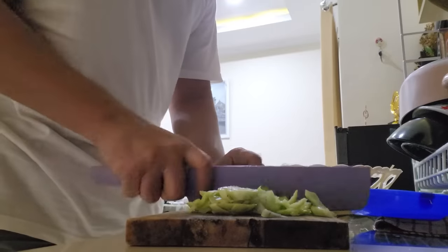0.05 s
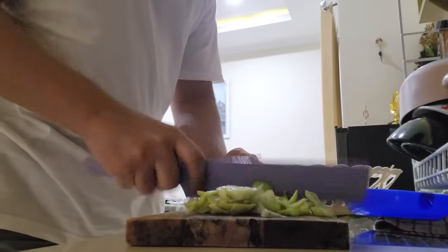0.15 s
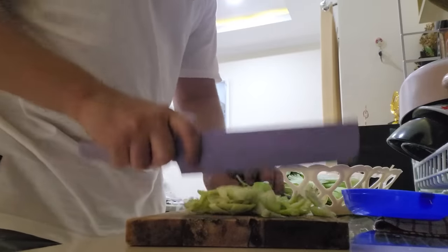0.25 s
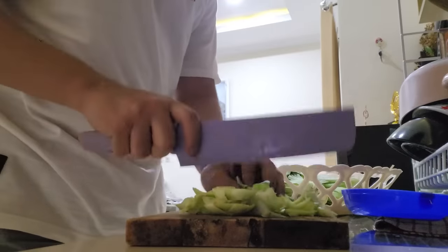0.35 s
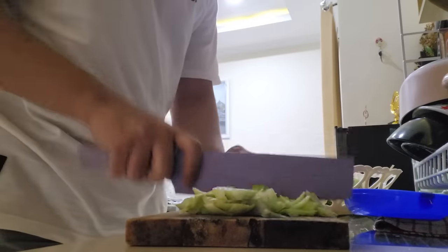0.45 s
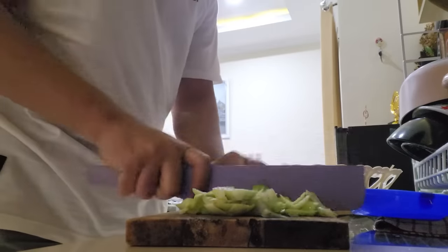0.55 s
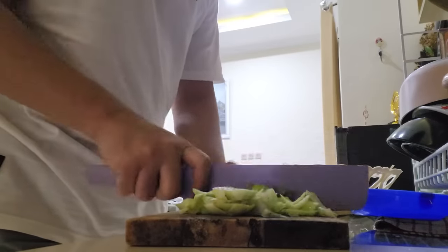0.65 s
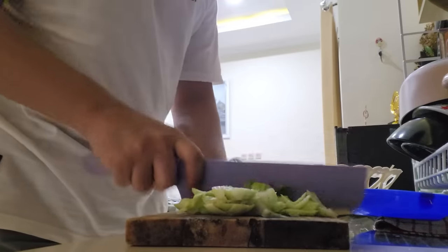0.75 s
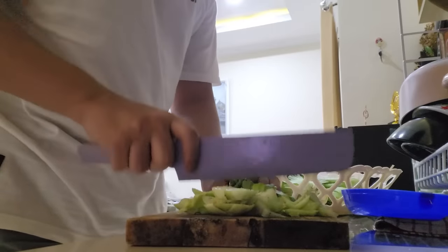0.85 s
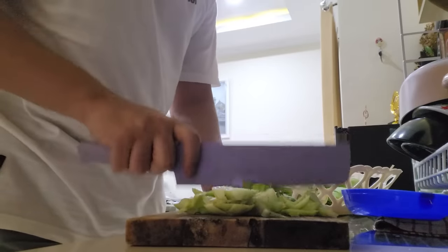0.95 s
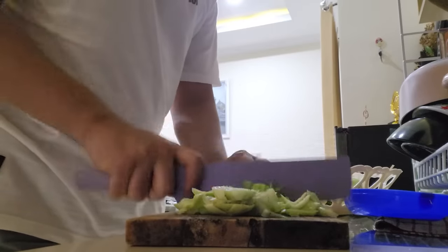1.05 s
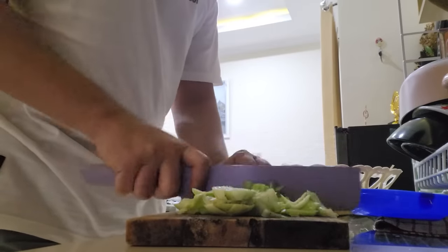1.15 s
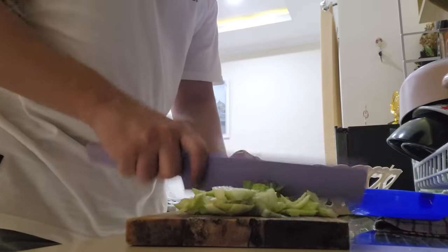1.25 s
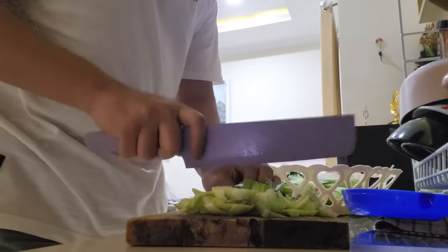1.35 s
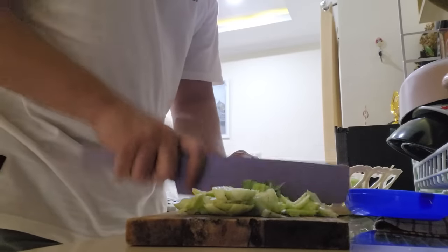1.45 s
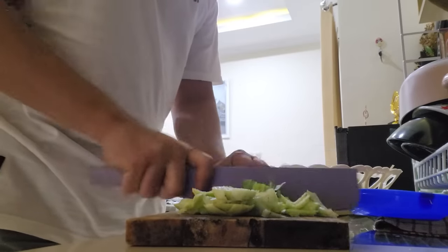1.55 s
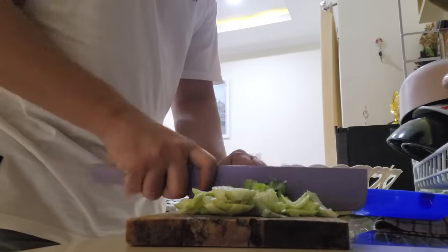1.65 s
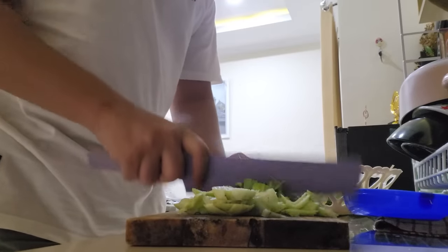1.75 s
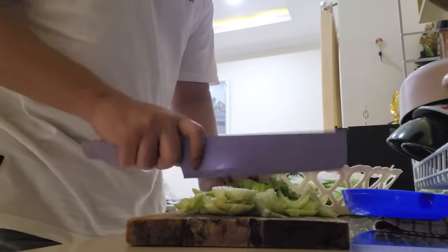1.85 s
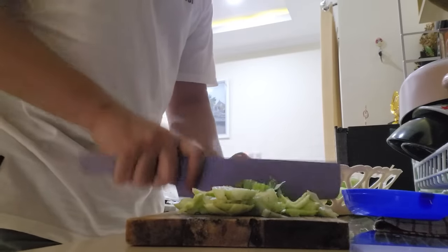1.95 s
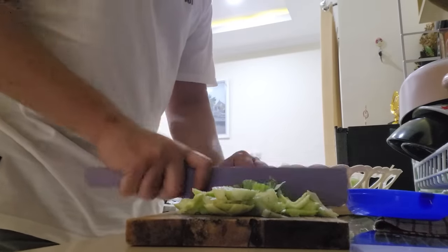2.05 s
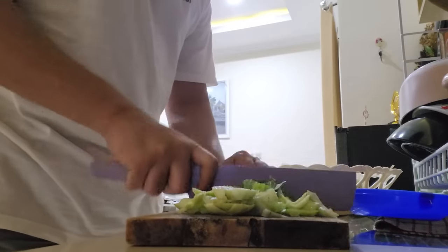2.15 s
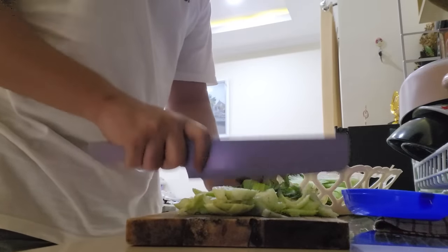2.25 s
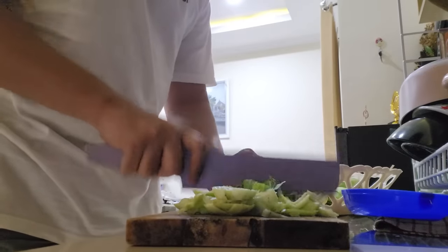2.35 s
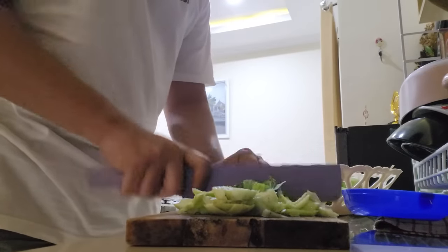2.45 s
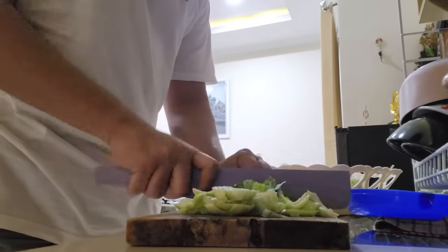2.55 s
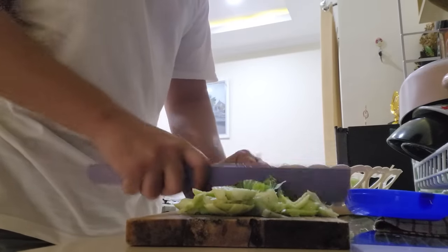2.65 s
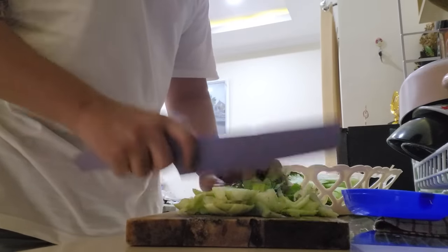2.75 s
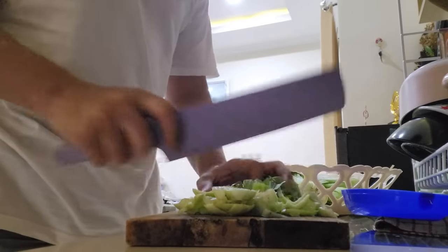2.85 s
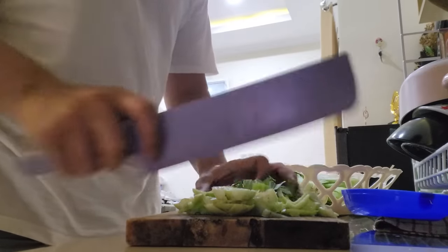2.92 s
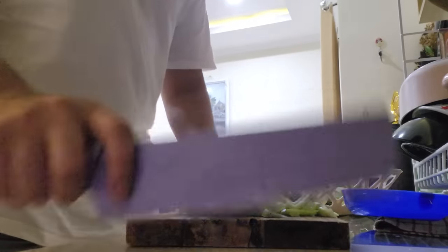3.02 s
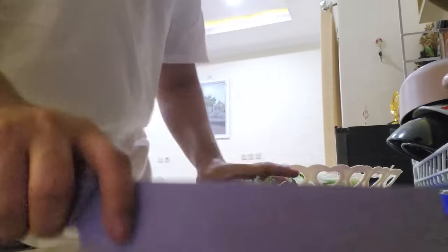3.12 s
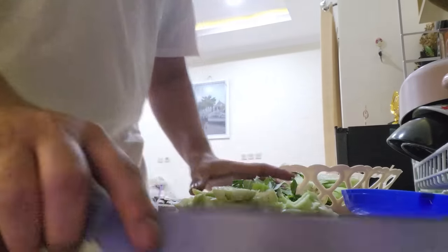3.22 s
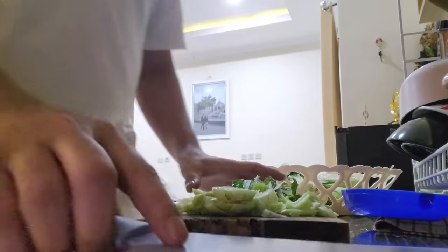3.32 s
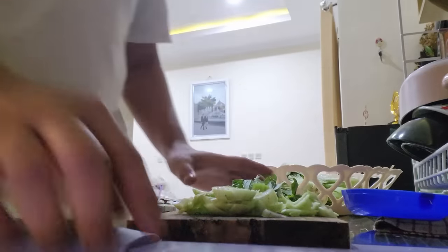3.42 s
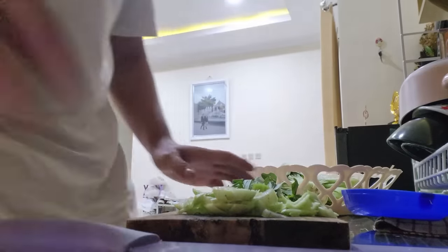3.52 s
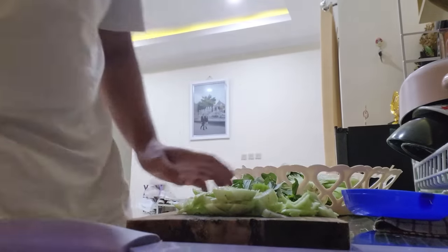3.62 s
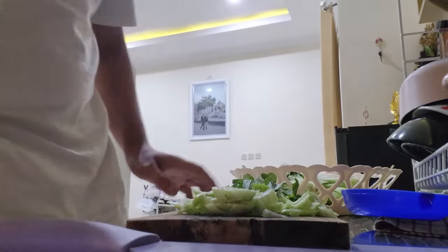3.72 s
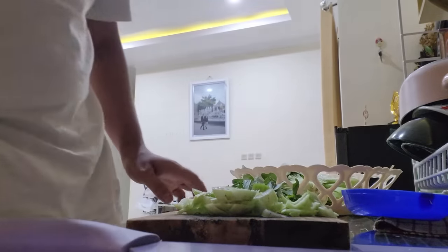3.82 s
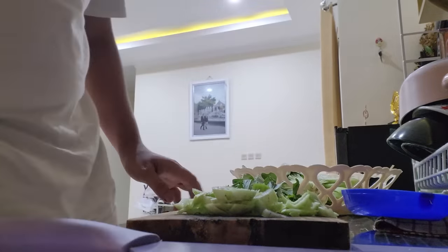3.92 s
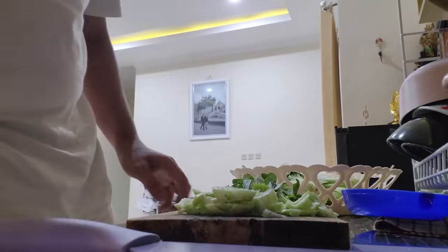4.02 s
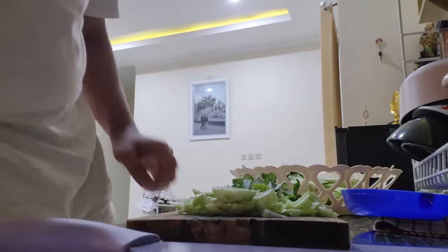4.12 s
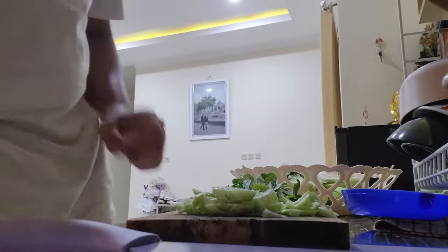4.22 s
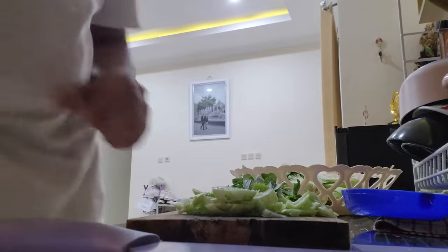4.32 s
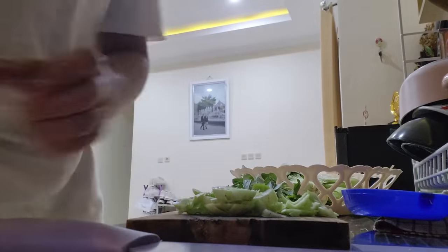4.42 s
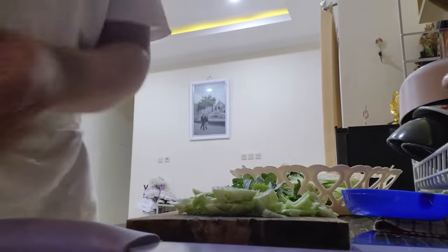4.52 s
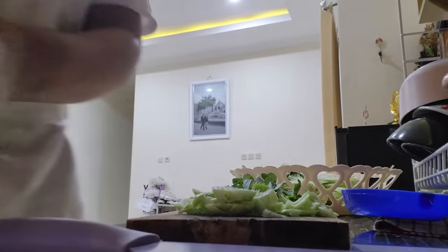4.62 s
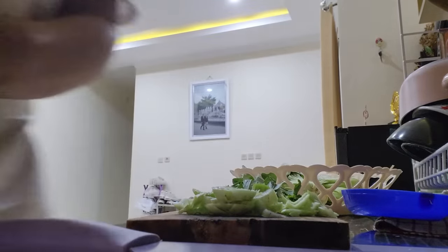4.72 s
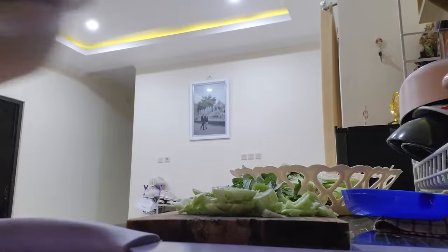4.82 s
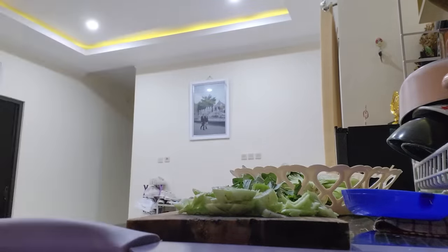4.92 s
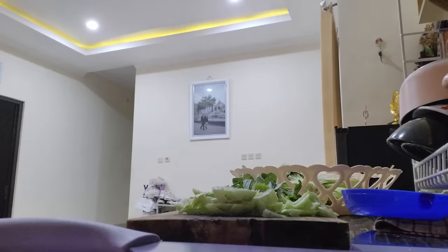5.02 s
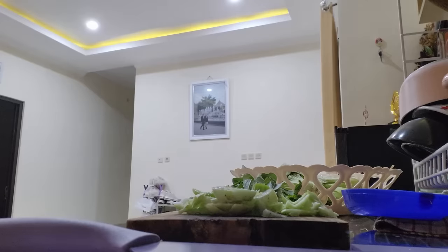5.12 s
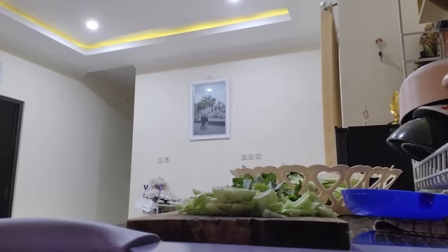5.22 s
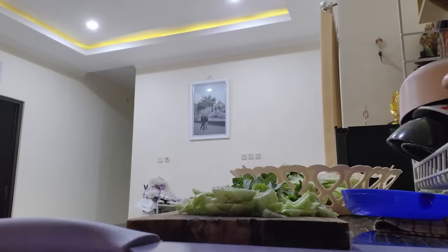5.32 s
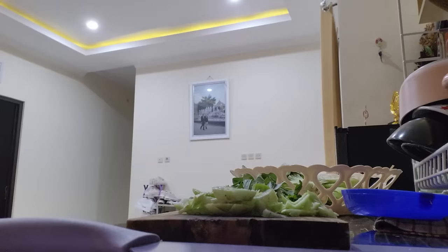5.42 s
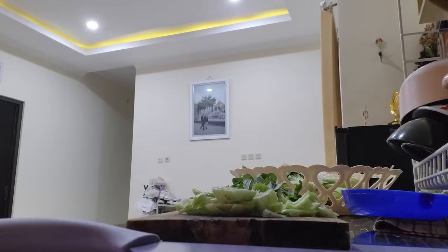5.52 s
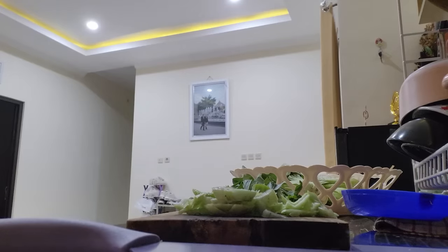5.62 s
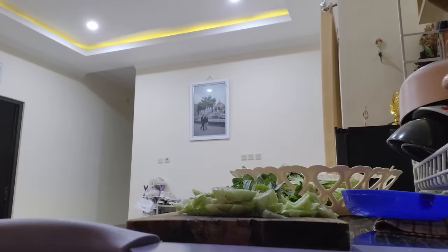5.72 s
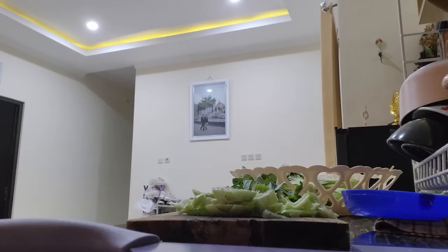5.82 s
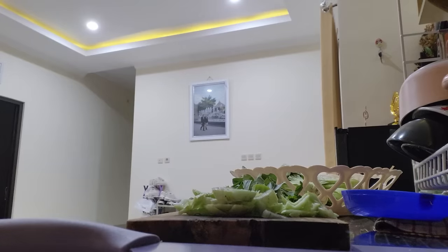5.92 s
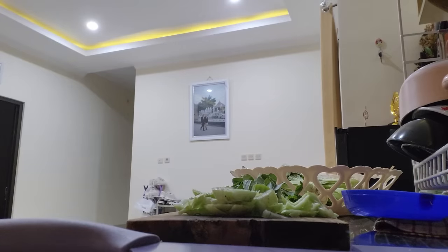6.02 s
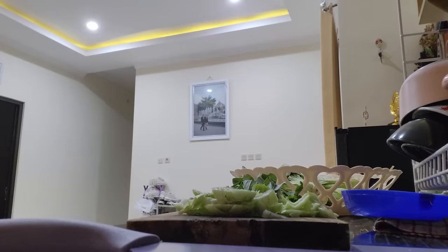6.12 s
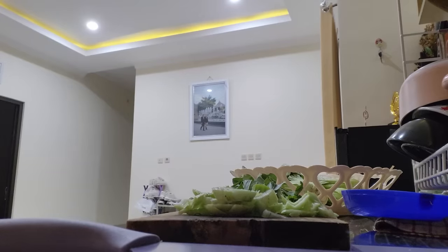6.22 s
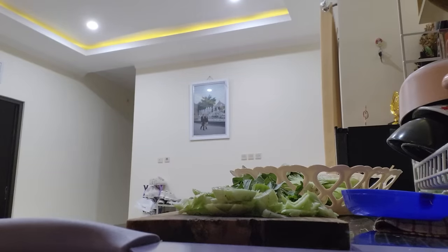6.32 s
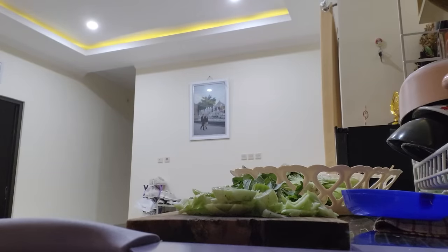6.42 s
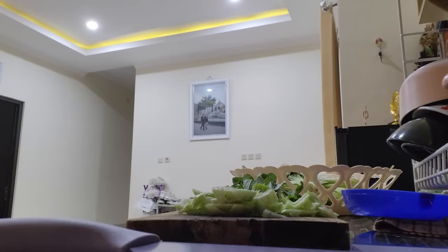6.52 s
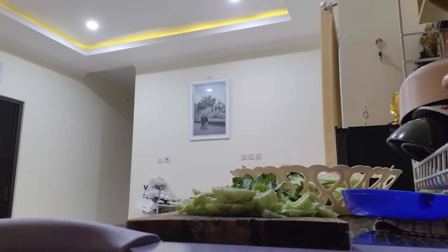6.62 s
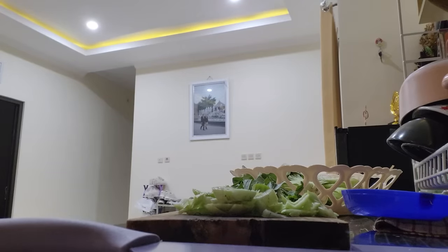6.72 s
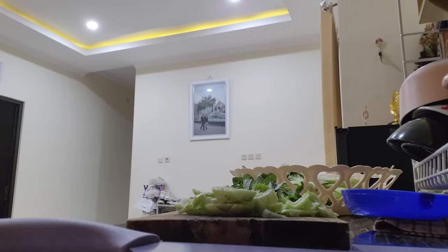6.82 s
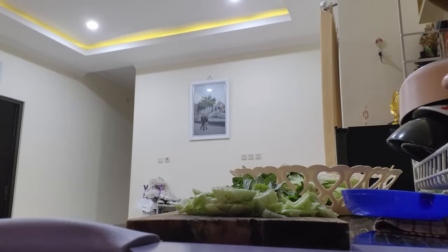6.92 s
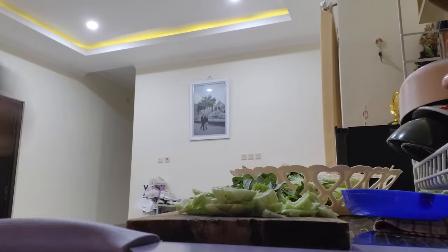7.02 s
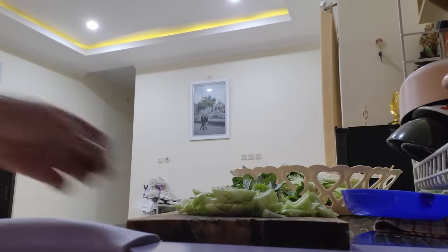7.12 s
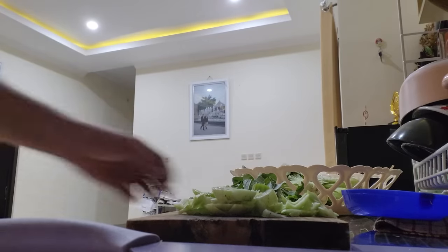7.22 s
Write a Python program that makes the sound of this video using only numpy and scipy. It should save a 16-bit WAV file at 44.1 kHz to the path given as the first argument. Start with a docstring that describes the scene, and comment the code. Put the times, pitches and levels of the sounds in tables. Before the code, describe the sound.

From the start, a large knife slices cabbage on a thick wooden board, close and slightly left. Six strokes fall about half a second apart until 2.7 seconds, each a wet crunch with a wooden knock, with soft leaf rustles and small snaps between them. At about 3.3 seconds the knife's handle hits the counter loudly beside the microphone, and around 3.5 the blade chatters and drops flat with a sharp clatter. From 4 to 4.7 seconds a few quieter hollow knocks and dull thuds come from across the room. A thin, high hinge squeak runs from 5.2 to 5.5 seconds, followed by several latch clicks. The door shuts at about 6.2 seconds with a sharp knock and low boom, then one more click. The hard kitchen walls add a short echo. A faint, slowly pulsing motor hum runs throughout, remaining with soft hiss until about 7.3 seconds.

```python
"""A hard-walled kitchen, a stereo microphone on the counter, two motors humming a little out of step.
Close on the left a big knife slices cabbage six times: cells burst and a thick wooden board knocks.
The knife is laid down beside the microphone, handle first, and its blade clatters flat.
The cook walks off to hollow knocks; across the room a hinge squeaks, latches click and a door shuts."""
import sys
import numpy as np
from scipy import signal
from scipy.fft import rfft, irfft
from scipy.io import wavfile

SR = 44100
rng = np.random.default_rng(int(sys.argv[2]) if len(sys.argv) > 2 else 0)


def wav_out(sig):
    """Save sig, one row per channel (or a flat mono array), as 16-bit PCM at SR to the path in sys.argv[1]."""
    wavfile.write(sys.argv[1], SR, np.round(np.clip(np.atleast_2d(sig).T, -1, 1) * 32767).astype(np.int16))


N = 320166
TIME = np.arange(N) / SR


def from_db(db):
    """Gain of a level in dB."""
    return np.exp(np.asarray(db) * np.log(10) / 20)


def rms_one(x):
    """Scale to rms 1."""
    return x / np.sqrt(np.mean(x ** 2) + 1e-20)


def in_time(rows, outside=None):
    """Columns joined by straight lines in time, one value a sample."""
    times, *columns = np.transpose(rows)
    return [np.interp(TIME, times, column, outside, outside) for column in columns]


def at_hz(points, hz):
    """Read a curve on a log frequency axis."""
    known_hz, values = np.transpose(points)
    return np.interp(np.log(np.maximum(hz, 1)), np.log(known_hz), values)


def band(x, low_hz, high_hz):
    """Band-pass."""
    sos = signal.butter(2, [low_hz, min(high_hz, .45 * SR)], "band", fs=SR, output="sos")
    return signal.sosfilt(sos, x + 1e-18)


def colour(x, spectrum):
    """Give a dense sound a spectrum; rms 1."""
    hz = np.fft.rfftfreq(N, 1 / SR)
    return rms_one(irfft(rfft(x) * from_db(at_hz(spectrum, hz)), N))


def drift(rate_hz):
    """Smooth random wander; rms 1."""
    r = np.exp(-80 * np.pi * rate_hz / SR)
    slow = signal.lfilter([1], [1, -2 * r, r * r], rng.standard_normal(N // 40 + 2002))[2000:]
    return np.interp(np.arange(N) / 40, np.arange(len(slow)), rms_one(slow))


def body(force, modes, uneven_db=2.5):
    """A force rings a body's modes, each with wandering strength; neighbours swing opposite ways."""
    out = 0
    for k, (hz, level_db, t60) in enumerate(modes):
        r, w = from_db(-60 / (t60 * SR)), 2 * np.pi * hz / SR
        drive = force * from_db(level_db + uneven_db * drift(15)[:force.shape[-1]]) + 1e-18
        out = out + (-1) ** k * signal.lfilter([0, np.sin(w)], [1, -2 * r * np.cos(w), r * r], drive)
    return out


def resonances(peaks, white):
    """Noise through narrow resonances."""
    return sum(from_db(db) * rms_one(band(white, hz - w / 2, hz + w / 2)) for hz, w, db in peaks)


def grains(per_s, spread_db):
    """Random clicks of uneven size; rms 1."""
    sizes = from_db(spread_db * np.minimum(rng.exponential(1, N), 4)) * rng.choice([-1, 1], N)
    return rms_one(sizes * (rng.random(N) < per_s / SR))


def impulses(times, levels_db):
    """One click at each time."""
    out = np.zeros(N)
    out[(np.asarray(times) * SR).astype(int)] = from_db(levels_db)
    return out


def dying(start_s, t60):
    """Silent before the start, then falling 60 dB in t60."""
    age = TIME - start_s
    return (age >= 0) * from_db(-60 * np.maximum(age, 0) / t60)


def swell(start_s, top_s, start_db, top_db, t60, bite_s=0.021):
    """Bites at the start, grows evenly in dB to its top, then dies."""
    corners = [(start_s - bite_s, start_db - 28), (start_s, start_db), (top_s, top_db)]
    return from_db(in_time(corners, outside=-200)[0]) + from_db(top_db) * dying(top_s + 1 / SR, t60)


def thuds(rows, low_hz, high_hz):
    """Bursts of low noise that start at once and die."""
    envelope = sum(from_db(db) * dying(s, t60) for s, db, t60 in rows)
    return envelope * rms_one(band(rng.standard_normal(N), low_hz, high_hz))


def place(x, pan_db, lag):
    """At the microphone the left side is pan_db louder and the right `lag` samples later."""
    x = np.atleast_2d(x)
    late = np.interp(np.arange(N) - lag, np.arange(N), x[-1])
    return np.array([x[0], late]) * from_db([[pan_db / 2], [-pan_db / 2]])


# Motor housings droning in the room: (frequency [Hz], width [Hz], level [dB])
HOUSING_DRONES = [(392, 14, -75), (454.3, 15, -77)]

def motors(white, hum_hz=100.08, hum_db=-54.8, beat_hz=2.28, beat_top_s=4.43):
    """Two close motor tones beat slowly over the drone of their housings."""
    phase = 2 * np.pi * hum_hz * TIME
    first = from_db(1.2 * drift(6)) * np.sin(phase)
    second = .5 * np.sin(phase - 2 * np.pi * beat_hz * (TIME - beat_top_s))
    return np.sqrt(2) * from_db(hum_db) * (first + second) + resonances(HOUSING_DRONES, white)


# Room tone all round the microphone: (frequency [Hz], density [dB])
ROOM_TONE_SPECTRUM = [(15, -40), (25, -12), (74, -5.5), (92, -9.5), (108, -18), (130, -18.5), (157, -25),
                      (277, -22), (439, -24.5), (863, -25), (2280, -32.5), (2610, -32.5), (2910, -31.5),
                      (5280, -44.5), (11600, -47.5), (16000, -69)]
# Its slow rise and fall: (time [s], level [dB])
ROOM_TONE_LEVEL = [(0, -61), (3.0, -64.5), (5.0, -66.5), (6.5, -58), (7.26, -63.5)]

def room_tone(white, loud, wash_db=-36, wash_t60=.6):
    """Low room noise; the house answers loud sounds with a dull wash."""
    air = colour(white, ROOM_TONE_SPECTRUM)
    level = from_db(in_time(ROOM_TONE_LEVEL)[0] + 0.5 * drift(6))
    decay = from_db(-120 / (wash_t60 * SR))
    lingering_power = signal.lfilter([20 * (1 - decay)], [1, -decay], np.mean(loud ** 2, axis=0))
    return level * air + from_db(wash_db) * np.sqrt(lingering_power) * band(air, 56, 16000)


# Cabbage leaf cracking, heard close: (frequency [Hz], density [dB])
LEAF_SPECTRUM = [(290, -24.5), (500, -6.5), (586, -17), (784, -29), (906, -7), (1460, -14.5), (1980, -9),
                 (2570, -8.5), (3340, -3), (5700, -12), (8000, -13.5), (11500, -16), (16000, -19)]

def wet_cracks(clicks, t60=0.0064):
    """Each click becomes a moment of noise, a wet crack in a leaf."""
    decay = from_db(-120 / (t60 * SR))
    envelope = np.sqrt(signal.lfilter([1], [1, -decay], clicks ** 2 + 1e-18))
    return colour(envelope * rng.standard_normal(N), LEAF_SPECTRUM)


# Knife strokes, close left: (landing time [s], cut length [s], crunch top before landing [s],
# entry [dB], crunch [dB], rumble [dB], t60 [s], knock [dB], thump [dB], relative treble [dB])
KNIFE_STROKES = [(0.039, 0.032, 0.0041, -29.5, -24, -18.5, 0.098, -20, -38, -15),
                 (0.666, 0.07, 0.016, -46, -24.5, -28, 0.1, -18, -33, -6),
                 (1.202, 0.083, 0.0024, -54, -31.5, -37, 0.26, -53, -32, -11),
                 (1.661, 0.091, 0.011, -48.5, -31.5, -29.5, 0.12, -37, -33.5, -8.5),
                 (2.17, 0.058, 0.0094, -54.5, -31.5, -29.5, 0.17, -44, -43, -2.5),
                 (2.634, 0.045, 0.014, -51, -28.5, -29, 0.22, -17.5, -36, -21)]
# Modes of the blade held in the hand: (frequency [Hz], level [dB], t60 [s])
HELD_BLADE_MODES = [(1020, -2, .02), (1880, -3, .03), (2030, 0, .03), (2340, 0, .035), (2760, 0, .03),
                    (3580, 1, .035), (4190, -1, .03), (4900, 0, .03), (5750, 3, .03), (6350, 0, .03)]

def cabbage_crunch(blade_share=.6):
    """Cells burst as dense wet cracks; part of the crunch sings through the blade."""
    crunch, treble = 0, 0
    for lands, lasts, early, entry_db, crunch_db, _, t60, _, _, treble_db in KNIFE_STROKES:
        stroke = swell(lands - lasts, lands - early, entry_db, crunch_db, t60)
        crunch = crunch + stroke
        treble = treble + from_db(treble_db) * stroke
    dense = grains(10000 * from_db(2 * drift(60)), spread_db=-2)
    lone = from_db(-30) * grains(150, spread_db=-12)
    cracks = wet_cracks(dense + lone)
    cracks = rms_one(cracks + blade_share * rms_one(body(cracks, HELD_BLADE_MODES)))
    dull = signal.lfilter([.45], [1, -.55], cracks)  # below about 4 kHz
    return crunch * dull + treble * (cracks - dull)


# Modes of the thick wooden board: (frequency [Hz], level [dB], t60 [s])
BOARD_MODES = [(193, -9, 0.014), (252.6, -16.5, 0.058), (326, -13, 0.021), (414, 3.5, 0.025),
               (481.4, 0.5, 0.031), (543, -10, 0.03), (700, -10, .02), (887, -8.5, 0.028), (958, -8, 0.022),
               (1109, -7, 0.026), (1392, -16, 0.036), (2017, -19, 0.049), (2317, -13, 0.051)]

def board_rumble(rise_db=27):
    """The juddering cut shakes the board, harder and harder until the edge lands."""
    envelope = sum(swell(lands - lasts, lands, db - rise_db, db, 0.95 * t60)
                   for lands, lasts, _, _, _, db, t60, *_ in KNIFE_STROKES)
    return envelope * rms_one(body(grains(1500, spread_db=1), BOARD_MODES))


# The blade breaks through a layer or rocks after landing: (time [s], level [dB])
BOARD_JOLTS = [(.0415, -16.5), (.096, -41), (0.137, -39), (0.16, -39), (0.217, -43), (0.632, -30.5),
               (0.751, -51), (1.135, -58), (1.171, -29), (1.203, -31), (1.228, -32), (1.575, -28),
               (1.64, -27.5), (2.139, -30.5), (2.146, -33), (2.156, -31.5), (2.177, -26), (2.203, -41),
               (2.601, -28.5), (2.62, -19.5), (2.628, -39), (2.673, -35), (2.714, -44)]
# The loose board wobbles on the counter: (time [s], level [dB], t60 [s])
BOARD_WOBBLES = [(.042, -36, 0.41), (.67, -39.5, 0.35), (1.2, -40.5, 0.39), (1.665, -44, 0.33),
                 (2.17, -50, 0.46), (2.635, -37.5, 0.3)]
# Modes of the counter under the board: (frequency [Hz], level [dB], t60 [s])
COUNTER_MODES = [(34.7, -7.5, 0.84), (66.95, -9, 1), (92, 0.5, 0.24), (109, -2.5, 0.2), (159, -13, 0.3)]

def edge_landings():
    """Blunt contacts ring the board and set it wobbling; the counter under it thumps."""
    times, *_, knock_db, thump_db, _ = np.transpose(KNIFE_STROKES)
    contacts = impulses(times, knock_db) + impulses(*np.transpose(BOARD_JOLTS))
    blunt = signal.lfilter([.2], [1, -.8], contacts)
    knock = body(blunt, BOARD_MODES) + thuds(BOARD_WOBBLES, 140, 340)
    thump = band(body(impulses(times, thump_db), COUNTER_MODES), 30, 400)
    return knock, thump


# Leaves shifting under the hand, close left: (middle time [s], length [s], level [dB])
LEAF_SHUFFLES = [(0.234, 0.036, -57.5), (0.389, 0.21, -57), (0.578, 0.033, -52), (0.813, 0.0082, -62),
                 (0.883, 0.18, -57), (1.334, 0.14, -65), (2.304, 0.23, -67), (1.958, 0.67, -61),
                 (2.076, 0.049, -56), (2.522, 0.039, -65), (2.891, 0.24, -61)]

def leaf_rustle():
    """Loose shreds brush each other in soft, dull clumps."""
    envelope = sum(from_db(db) * np.exp(-(2 * (TIME - s) / length) ** 2)
                   for s, length, db in LEAF_SHUFFLES)
    shreds = wet_cracks(grains(9000, spread_db=-2)) * from_db(3 * drift(9))
    return envelope * (band(shreds, 100, 4300) + 0.69 * shreds)


# Thick ribs snapping on the board: (time [s], level [dB])
RIB_SNAPS = [(0.571, -38), (0.6029, -27), (0.625, -33), (0.812, -35.5), (1.091, -47.5), (1.1347, -35),
             (1.166, -41), (1.195, -30), (1.5734, -27.5), (1.854, -66), (1.904, -52), (1.969, -43.5),
             (2.103, -38.5), (2.1452, -30.5), (2.599, -37), (2.617, -47), (2.905, -53), (2.961, -67),
             (3.019, -59)]

def rib_snaps():
    """A rib tears for a few milliseconds and rings the board."""
    envelope = signal.lfilter([1], [1, -.995], impulses(*np.transpose(RIB_SNAPS)))
    tears = envelope * rng.standard_normal(N)
    return band(tears, 1100, 6700) + from_db(-33.5) * body(tears, BOARD_MODES)


def blows(events, modes, low_hz=300, mid_top_hz=4000, top_hz=15000, crack_top_hz=3200):
    """Each blow is a crack in a rattle that swells and dies, heard directly and through the modes."""
    edges_hz = np.array([(low_hz, 1600), (1500, mid_top_hz), (4000, top_hz), (600, crack_top_hz)])
    lead = SR // 20
    start = int(events[0][0] * SR) - lead
    span = min(int(events[-1][0] * SR) + SR, N) - start
    t = np.arange(-lead, SR // 3) / SR
    forces = np.zeros((4, 2, 2, span + SR))  # band, direct or ringing, left or right, sample
    crack = np.arange(len(t)) == lead + int(.001 * SR)  # just after the rattle's top
    for s, crack_db, *rattle_db, ring_db, pan_db, swell_s, t60 in events:
        shape = np.where(t < 0, np.exp(np.minimum(t, 0) / swell_s), from_db(-60 * t / max(t60, .004)))
        mid, side = rng.standard_normal((2, len(t)))
        rattle = shape * (mid + .45 * side * [[1], [-1]])
        bands_db = np.array([*rattle_db, crack_db])[:, None, None]
        gains = from_db(bands_db + [[0], [ring_db]] + [pan_db / 2, -pan_db / 2])
        gains[2] *= from_db([.25, -.25])  # treble reaches the left side more freely
        sources = np.array([rattle, rattle, rattle, [crack, crack]])
        at = int(s * SR) - lead - start
        forces[..., at:at + len(t)] += gains[..., None] * sources[:, None]
    shares = 2 * np.diff(edges_hz)[:, 0] / SR  # what each band keeps of a click's height
    shares[:3] **= .5  # or of a noise's rms
    direct, ringing = sum(band(band(force[..., :span], low / 1.2, high * 1.2), low, high) / share
                          for force, (low, high), share in zip(forces, edges_hz, shares))
    return np.pad(direct + body(ringing, modes), [(0, 0), (start, N - start - span)])


# The handle meets the counter beside the microphone: (time [s], crack [dB], rattle low [dB],
# mid [dB], treble [dB], relative ring [dB], left over right [dB], swell [s], rattle t60 [s])
HANDLE_BLOWS = [(3.2635, -0.3, -23.5, -17, -52.5, -31, 2, 0.0053, 0.04),
                (3.28, -6, -26, -28, -52.5, -28.5, 0, 0.0012, 0.087),
                (3.2926, -14, -28.5, -26.5, -54.5, -33, -2, .001, 0.034),
                (3.3, -19.5, -30.5, -32.5, -54.5, -31, -1, .001, 0.16),
                (3.348, -32.5, -37, -37.5, -66, -47.5, 1.5, .001, 0.079)]
# Modes of the handle: (frequency [Hz], level [dB], t60 [s])
HANDLE_MODES = [(470, -5, .06), (830, -8, .03), (930, -7, 0.04), (1040, -8, .04), (1420, -7, 0.04),
                (2040, -8, 0.04), (2380, -10, .035), (2600, -7, .035), (2900, -10, 0.03)]

def knife_handle():
    """The handle strikes the counter and settles in ever softer blows."""
    return blows(HANDLE_BLOWS, HANDLE_MODES, mid_top_hz=2650, crack_top_hz=2480)


# The blade meets the counter, close and a little right: columns as HANDLE_BLOWS
BLADE_BLOWS = [(3.4395, -30, -42, -35, -36, -32.5, 5, .0007, 0.067),
               (3.4605, -32.5, -47, -34.5, -36.5, -33, 4.5, 0.0006, 0.083),
               (3.488, -30, -48.5, -35.5, -37, -27, 3.5, 0.0008, 0.059),
               (3.51, -27.5, -40.5, -33, -39, -36, 4.5, 0.00072, 0.078),
               (3.532, -29.5, -40, -31.5, -38.5, -35.5, 0.5, 0.0045, 0.037),
               (3.5413, -1.5, -23, -25.5, -35, -25.5, 2, 0.0033, 0.024),
               (3.553, -12, -22, -31.5, -34.5, -32, 4.5, .001, 0.093),
               (3.559, -17, -28, -28.5, -31, -43, -1, 0.00067, 0.032),
               (3.571, -19, -34.5, -31, -29.5, -40.5, 1.5, 0.00091, .12)]
# Modes of the blade on the counter: (frequency [Hz], level [dB], t60 [s])
LOOSE_BLADE_MODES = [(629, -1, 0.05), (750, -2, 0.045), (870, -5, .04), (1000, -5, 0.045), (1085, -8, 0.07),
                     (1180, -5, 0.04), (1440, -12, .04), (1880, -6, 0.02), (2740, -5, .02), (3300, 5, .012),
                     (3520, 5, 0.018), (4800, -10, .025), (5700, -9, .025), (9040, -4, 0.02),
                     (11800, -4, .02), (13300, -1, 0.03), (14800, -4, .025)]

def blade_clatter():
    """The blade chatters against the counter, then drops flat."""
    return blows(BLADE_BLOWS, LOOSE_BLADE_MODES, crack_top_hz=3700)


# Thuds through floor and counter: (time [s], level [dB], t60 [s])
FLOOR_THUDS = [(3.539, -27, 0.21), (3.994, -51, 0.5), (4.2, -52, 0.23), (4.67, -54.5, 0.21),
               (5.445, -57, 0.21), (5.65, -41.5, 0.29), (5.71, -46.5, 0.18), (5.82, -61.5, 0.14),
               (5.948, -53, .2), (6.173, -25.5, 0.13)]

def floor_thuds():
    """Floor and counter carry blows to the microphone as dull thuds."""
    return thuds(FLOOR_THUDS, 230, 310)


# Knocks from across the room: columns as HANDLE_BLOWS
FAR_KNOCKS = [(3.991, -40, -43, -45.5, -60.5, -41, 1.5, 0.0027, 0.18),
              (4.036, -40, -42, -72.5, -92, -37.5, 3, 0.00069, 0.2),
              (4.064, -55, -50, -55, -66, -26.5, 2.5, 0.0016, 0.08),
              (4.15, -67, -68, -83, -93, -16.5, 0, .01, 0.084),
              (4.196, -56, -46, -47, -67.5, -22.5, 3, 0.0052, 0.11),
              (4.325, -77.5, -61, -63, -87, -31.5, -2, 0.00097, 0.05),
              (4.661, -27, -38.5, -43.5, -47.5, -26.5, 2.5, 0.0037, 0.1)]
# Modes of the far furniture: (frequency [Hz], level [dB], t60 [s])
FURNITURE_MODES = [(375, -12, .12), (535, -8, .17), (568, -9, .2), (670, -12, .12), (807, -14, .07),
                   (1007, -15, .05), (1180, -16, .05), (1394, -13, .07), (2130, -11, .04), (2570, -8, .05),
                   (2900, -8, .04)]
# Low wash after the knocks: (time [s], level [dB], t60 [s])
KNOCK_TAILS = [(4.0, -52, 0.48), (4.2, -45, 0.42), (4.665, -48.5, 0.51)]

def hollow_knocks():
    """Knocks ring the far furniture, and a hollow wash lingers."""
    knocks = blows(FAR_KNOCKS, FURNITURE_MODES, low_hz=363.5, mid_top_hz=3250, top_hz=9360,
                   crack_top_hz=2427)
    return knocks + thuds(KNOCK_TAILS, 376, 660)


# The door hinge, across the room: (time [s], pitch [Hz], level [dB])
HINGE_SQUEAK = [(5.16, 2960, -63.5), (5.185, 3070, -49.5), (5.215, 3100, -47), (5.25, 3105, -54.5),
                (5.28, 3265, -61), (5.306, 3290, -50), (5.31, 2850, -58), (5.325, 2720, -53),
                (5.362, 2650, -44), (5.41, 2660, -49.5), (5.44, 2650, -50.5), (5.5, 2570, -59)]

def hinge_squeak(rasp_db=-20.5):
    """Uneven slips make the hinge sing a rough tone over a broad scrape."""
    hz, level_db = in_time(HINGE_SQUEAK)
    turning = (TIME >= HINGE_SQUEAK[0][0]) & (TIME <= HINGE_SQUEAK[-1][0])
    phase = 2 * np.pi * np.cumsum(hz * (1 + .01 * drift(160))) / SR
    overtones = np.where(hz > 2900, .15 * np.sin(1.5 * phase) + .05 * np.sin(2 * phase),
                         .12 * np.sin(2 * phase) + .08 * np.sin(3 * phase))
    tone = (.65 + .6 * drift(150)) * np.sin(phase) + drift(200) * overtones
    rasp = from_db(rasp_db) * rms_one(band(grains(4000, spread_db=2), 2500, 12000))
    return turning * from_db(level_db + drift(88)) * (tone + rasp)


# Low rumble in the room: (time [s], level [dB])
RUMBLE_LEVEL = [(5.4, -84.5), (5.7, -56), (5.95, -71), (6.5, -55), (6.9, -67), (7.26, -65.5)]
# Thin hiss in the room: (time [s], level [dB])
THIN_HISS_LEVEL = [(5.0, -100), (6.4, -78), (7.26, -72.5)]
# Its bands: (frequency [Hz], width [Hz], level [dB])
HISS_BANDS = [(3430, 200, -6), (5310, 250, -10), (6100, 800, -4), (7700, 450, -5), (11600, 400, -9),
              (12500, 400, -11)]

def rumble_and_hiss(white):
    """A low rumble comes up as the door moves, and a thin banded hiss follows."""
    rumble = from_db(in_time(RUMBLE_LEVEL)[0] + 7.1 * drift(4)) * rms_one(band(white, 110, 460))
    hiss = rms_one(resonances(HISS_BANDS, white) + .9 * rms_one(band(white, 2000, 13000)))
    return rumble + from_db(in_time(THIN_HISS_LEVEL)[0]) * hiss


# Latches and the shutting door, across the room: columns as HANDLE_BLOWS
LATCH_BLOWS = [(5.442, -32, -42.5, -52.5, -54.5, -31, 2, 0.00066, 0.2),
               (5.611, -45.5, -52, -56.5, -77, -28.5, 0.5, 0.00098, .15),
               (5.641, -31, -41, -42.5, -69.5, -42.5, 1.5, 0.0015, 0.34),
               (5.691, -17, -36, -26.5, -55.5, -34, 2, 0.0006, 0.081),
               (5.795, -43.5, -41, -47, -46, -47, 2, 0.00072, 0.11),
               (5.951, -48.5, -55.5, -63, -76.5, -41, 2.5, 0.0025, 0.87),
               (6.0515, -24, -20.5, -22, -30.5, -35.5, 2, 0.0032, 0.12),
               (6.165, -39, -52.5, -43, -49, -19.5, 4, 0.0055, .03),
               (6.175, -7.5, -24.5, -25.5, -35, -48.5, -0.5, 0.0032, 0.25),
               (6.1843, -17, -26, -21, -17, -24.5, 3.5, 0.00091, 0.1),
               (6.397, -26.5, -38, -41, -57, -66, 4, 0.0064, 0.19)]
# Modes of door and latches: (frequency [Hz], level [dB], t60 [s])
DOOR_MODES = [(605, -4.5, 0.036), (800, -9, 0.05), (994, -7, .04), (1280, -9, 0.029), (2250, -9, 0.025),
              (2560, -2, 0.02), (2710, -1, .022), (2935, -2, .02), (3300, -0.5, .025), (4500, -7.5, .03),
              (5500, -7, 0.02), (7490, -7, .025), (9400, -8, 0.025), (12000, -7.5, 0.025),
              (13260, -3, .025)]

def door_latches():
    """Latches click and the door shuts, each blow ringing briefly."""
    return blows(LATCH_BLOWS, DOOR_MODES, low_hz=464)


def door_boom(slam_s=6.174):
    """The slam shakes air and floor: a low boom and a longer, uneven shudder."""
    boom = from_db(-23.5) * dying(slam_s, t60=0.42)
    shudder = from_db(-38 + 1.9 * drift(4)) * dying(slam_s, t60=0.87)
    return (boom + shudder) * rms_one(band(rng.standard_normal((2, N)), 27, 450))


# Reverberation between the hard walls: (frequency [Hz], t60 [s])
KITCHEN_T60 = [(60, 0.21), (250, 0.54), (430, 1), (600, .55), (1000, 0.54), (4000, 0.74), (14000, 0.43)]

def kitchen_reverb(x):
    """Dense reflections, different left and right, die by octave band."""
    t = np.arange(SR) / SR
    white = rng.standard_normal((2, SR))
    tail = sum(band(white, hz, 2 * hz) * from_db(-60 * t / at_hz(KITCHEN_T60, 1.3 * hz))
               for hz in 60 * 2. ** np.arange(9))
    tail = tail * np.clip(t / 0.006, 0, 1) / np.sqrt(np.sum(tail ** 2) / 2)
    flutter = .7 + .7 * drift(110)  # so no clear note hangs in the room
    return signal.fftconvolve(x * flutter, tail, axes=1)[:, :N]


def scene():
    """Board close on the left, knife beside the microphone, door across the room."""
    cutting = cabbage_crunch() + board_rumble() + leaf_rustle() + rib_snaps()
    knock, thump = edge_landings()
    cut_lag = 6 + 2 * drift(150)  # cracks come from all along the cut, so their lag wanders
    board = place(cutting, pan_db=3, lag=cut_lag) + place(knock, pan_db=3, lag=6)
    knife = place(knife_handle(), pan_db=1, lag=6.5) + place(blade_clatter(), pan_db=-2.5, lag=1)
    far = place(floor_thuds() + hollow_knocks() + hinge_squeak() + door_latches(), pan_db=-1, lag=1)
    direct = board + knife + far
    lows = place(thump, pan_db=2, lag=8.6) + door_boom()
    reverb = kitchen_reverb(from_db(-16.5) * (board + far) + from_db(-15) * knife)
    mid, side = rng.standard_normal((2, N))
    white = mid + 1.1 * side * [[1], [-1]]
    background = motors(white) + room_tone(white, direct) + rumble_and_hiss(white)
    return direct + lows + reverb + background


def record(dry):
    """At the microphone, peaks are rounded and the top is cut near 16 kHz."""
    rounded = 1.5 * np.tanh(dry / 1.5)
    return signal.sosfilt(signal.cheby2(12, 60, 16300, fs=SR, output="sos"), rounded)


dry = scene()
out = record(dry)
wav_out(out)
```